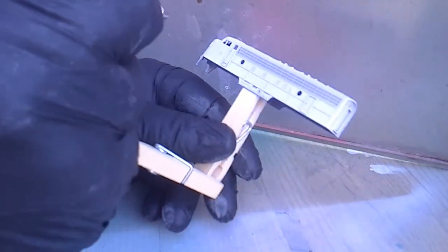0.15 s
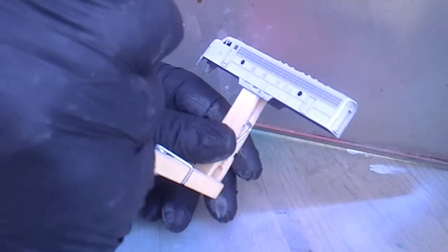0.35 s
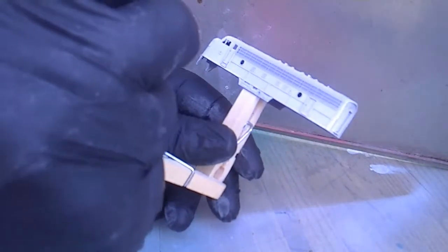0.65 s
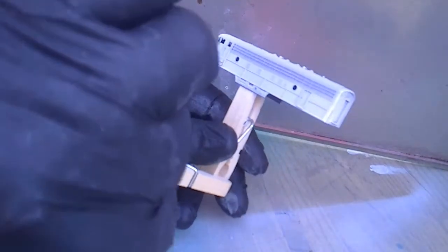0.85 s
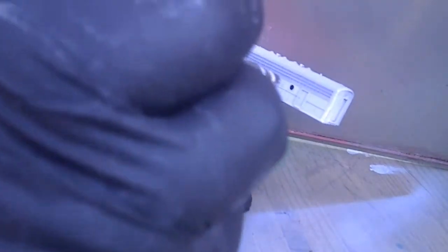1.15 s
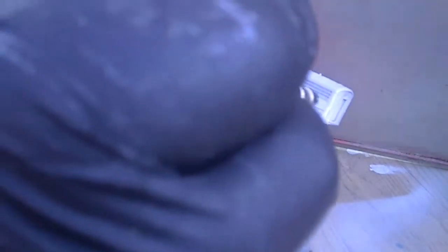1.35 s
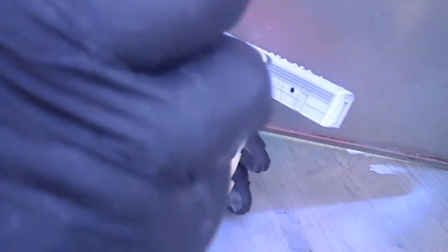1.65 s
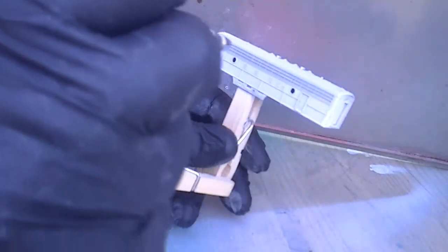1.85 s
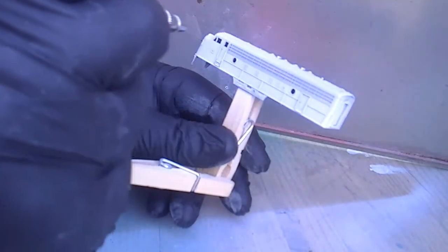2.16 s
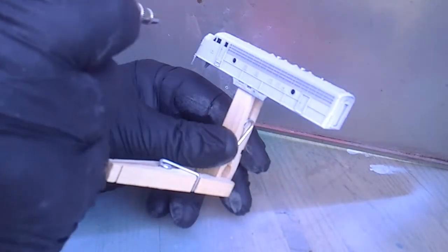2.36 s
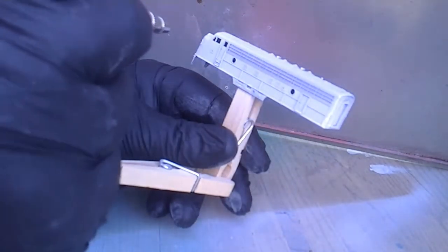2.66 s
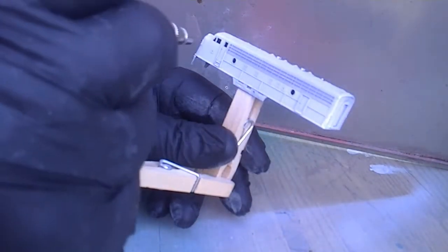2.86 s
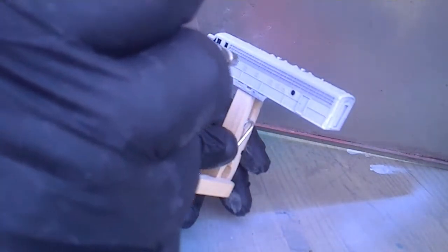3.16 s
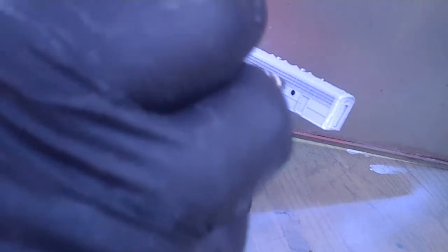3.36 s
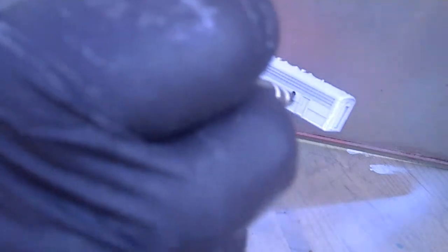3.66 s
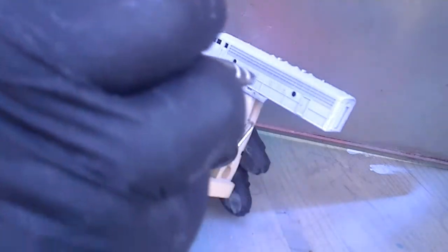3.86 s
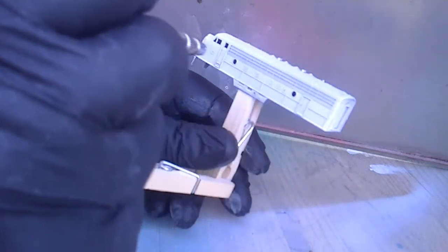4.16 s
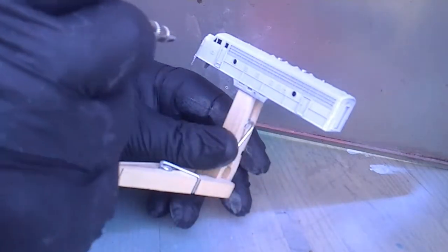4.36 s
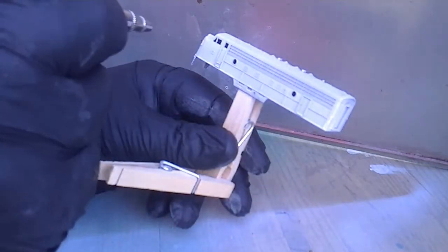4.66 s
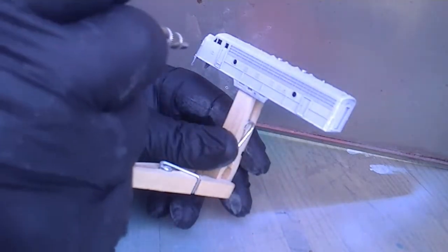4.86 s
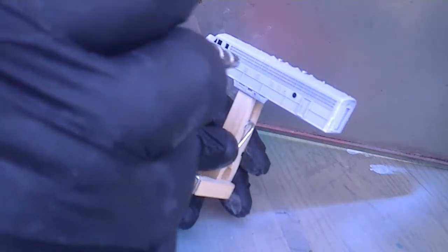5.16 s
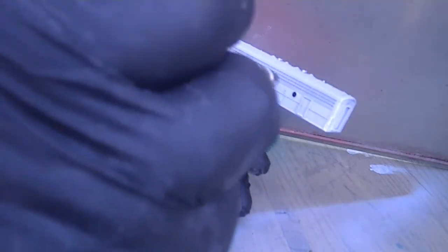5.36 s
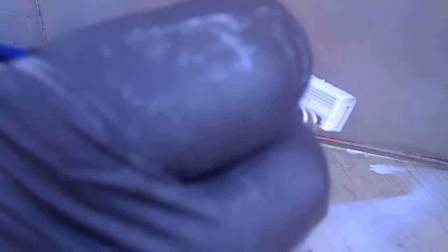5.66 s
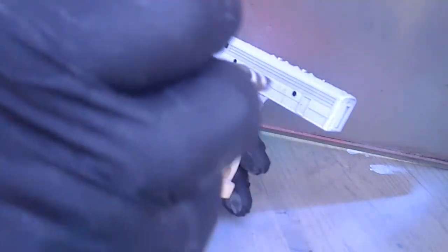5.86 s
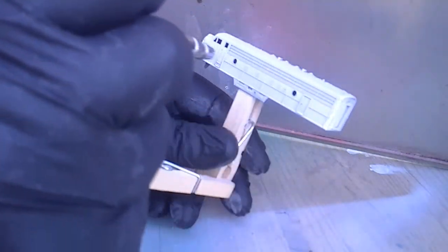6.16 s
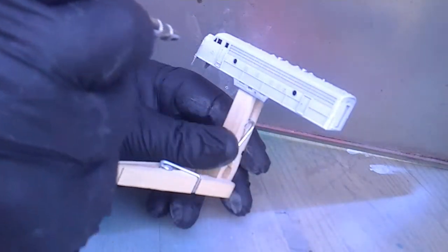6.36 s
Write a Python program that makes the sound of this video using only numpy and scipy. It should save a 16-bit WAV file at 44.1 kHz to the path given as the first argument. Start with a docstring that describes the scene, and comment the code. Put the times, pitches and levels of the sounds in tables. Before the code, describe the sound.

A fine jet of compressed air hisses continuously for about 6.5 seconds, close to a mono microphone in a dry, quiet room. At 0 s a short hollow plastic ring and the end of a pass give way to a roaring stroke along a small shell until about 1.4 s, after a rush and ring near 0.8 s and a singing edge burst at 1.2 s. More strokes follow, turning at about 1.4, 2.5, 3.6, 4.6 and 5.6 s, the hiss growing duller or brighter as the hand moves. Short breathy tonal bursts stand out around 2.0, 3.1, 3.4, 4.0, 5.1, 5.4 and 6.1 s. Strong bright rushes over the front end swell near 2.3, 2.9, 4.4, 5.0 and 6.5 s, the last cut off by the ending. Faint high whistles flicker throughout, over lumpy low air rumble.

```python
"""A steady airbrush hiss opens over a short ring of hollow plastic and the tail of a pass along its flat side.
The brush sweeps to and fro along the small model shell, close to a mono microphone: jet-driven resonances
roar on the flat side, sing in bursts at openings and edges, and rush over the shaped front end. The hiss is
filtered noise that changes colour as the hand moves, with a shifting echo; a lumpy low rumble lies below.
"""
import sys
import numpy as np
from scipy import signal
from scipy.fft import rfft, irfft, next_fast_len
from scipy.io import wavfile
from scipy.ndimage import map_coordinates

SR = 44100
rng = np.random.default_rng(int(sys.argv[2]) if len(sys.argv) > 2 else 0)


def transcribe(u):
    """Save the signal u as a 16-bit wav file named by the first command-line argument.

    u: samples, shape (n,) or (channels, n), limited to [-1, 1]; the rate is SR.
    q: integer samples, one column per channel.
    """
    v = np.clip(np.atleast_2d(u).T, -1, 1)
    q = np.round(v * 32767).astype(np.int16)
    wavfile.write(sys.argv[1], SR, q)


def volts_from_db(level):
    """Convert decibel levels to linear amplitude ratios."""
    exponent = np.asarray(level, float) / 20
    return 10 ** exponent


N = 287091  # length in samples

# Spectra and levels are relative where the sound is later scaled to rms 1.
# Resonance widths are those of one filter pass; each resonance is passed twice.

# nozzle hiss in the open at the left: hz, level_db
HISS_LEFT = [(100, -24.5), (500, -5.5), (1770, -10), (2400, -4), (3200, -10), (4600, -8), (5550, -4.5),
             (6150, -9.5), (6900, 0), (10200, -7), (11500, -1.5), (12800, -8.5), (15700, -4)]
# nozzle hiss from behind the hand at the right: hz, level_db
HISS_RIGHT = [(100, -24), (560, -4), (980, -11), (1350, -7), (1800, -12), (2200, -9), (2550, -20),
              (3150, -20), (3550, -5), (5900, -4), (8400, -7), (10300, -4), (13300, -5), (15700, -7)]
# the hand crosses the middle of its stroke, rightwards first, then turn about: middle_s, travel_s
MIDSTROKES = [(1.06, 0.47), (1.92, 0.51), (3.2, 0.56), (4.14, 0.76), (5.26, .5), (6.14, .45)]
# the hand's echo of the hiss: left_delay_ms, right_delay_ms, level_db, centre_hz, width_hz
HAND_ECHO = (.62, .775, -4, 11600, 4600)
# the hiss dips briefly: middle_s, length_s, share_lost_db
HISS_DIPS = [(.185, .04, -6)]
# narrow ripples in the hiss: hz, width_hz, level_db
HISS_RIPPLES = [(6830, 150, -3), (7300, 200, -4), (7780, 300, 0), (8200, 150, -2), (9100, 300, -2),
                (9700, 200, -4), (10870, 150, -4), (11450, 150, -4), (12500, 400, -6), (13300, 250, -8)]
# level of those ripples, strongest in the first second and near 6.25 s: time_s, level_db
RIPPLE_LEVEL = [(0, -29.5), (.9, -30.5), (1.15, -40), (2.4, -41), (4.3, -36), (5.9, -47), (6.25, -31),
                (6.51, -43)]
# faint 7 kHz whistle, its tone: hz, width_hz, level_db
WHISTLE_TONE = [(7000, 240, 0)]
# the whistle's swells, mostly near the left end: middle_s, length_s, level_db
WHISTLES = [(.75, 0.51, -36), (1.5, 0.21, -35), (2.38, 0.41, -38.5), (2.85, 0.36, -32.5), (4.53, .22, -29),
            (4.92, .22, -31), (6.48, .3, -39)]
NOZZLE_DB, SPLASH_DB = -24, -25  # steady hiss; hiss added per unit of rush over the front end
TREBLE_PATCHES_DB = -33  # bright treble patches that come and go at random in the hiss

# resonances of the shell and its holder: hz, width_hz
SHELL_MODES = [(560, 260), (740, 220), (980, 200), (1150, 240), (1460, 240), (1864, 150), (2030, 190),
               (2320, 150), (2430, 150), (2590, 220), (2880, 150), (3090, 180), (3230, 160), (3500, 250),
               (3736, 270), (4135, 180), (4350, 140), (4530, 180), (4975, 200), (5180, 250), (5410, 250),
               (5850, 350), (6400, 250), (7030, 280)]
# how strongly the jet excites each of them from the flat side: level_db
SIDE_DB = [-5.5, 0.5, 1, -2, 2, -7.5, -6.5, -17, -9.5, -7, -12, -13.5, -17, -11.5, -12, -13.5, -25, -19,
           -38, -56, -27, -13.5, -26, -23]
# the same for the singing edge tone: level_db
EDGE_TONE_DB = [-34, -31, -4.5, -4.5, -9, 2, 0, -2.5, -6, -22, -11, -9.5, -5, -3.5, 2, -9, -6, -6.5, -9,
                -26, -16.5, -9, -30, -11]
# the same from the front end: level_db
FRONT_DB = [-40, -30, -3.5, -8.5, -6.5, -6, -3, -11, -32, -6.5, -1, -5.5, -14, -9.5, -0.5, 0, -3.5, -4, -2,
            -15, -2.5, -13, -10.5, -13]
# air tearing at edges: hz, level_db
RUSH_TONE = [(500, -30), (1200, 5.5), (2000, 3.5), (4000, -13), (5800, 3), (6300, -6.5), (8000, -3.5),
             (12000, -21)]
# passes along the flat side: leave_s, length_s, level_db, rise_from_middle_to_end_db, fade_in_s
PASSES = [(.07, .8, -16.5, 0, .1), (1.41, 0.91, -21, 0, 0.23), (2.53, .89, -22, 0, 0.091),
          (3.6, 0.9, -21, 1, .12), (4.645, 0.975, -25, 2, 0.11), (5.62, 0.85, -22.5, 4, 0.053),
          (6.75, 0.86, -26, -4.5, 0.1)]
LEAVE_S, ARCH_DB, SPILL_DB = 0.12, 4, -41.5  # fade on leaving, loss towards the ends, level off the shell
# bursts of singing edge tone, at openings and at the shell's edges: middle_s, length_s, level_db
EDGE_TONES = [(0.763, 0.2, -26.5), (1.21, 0.08, -19), (1.986, 0.097, -30), (2.76, 0.15, -32),
              (3.07, .16, -24.5), (3.397, 0.12, -21.5), (3.795, .06, -31), (4.002, 0.14, -15.5),
              (4.352, .12, -27.5), (5.071, 0.14, -19.5), (5.401, 0.15, -22.5), (5.922, 0.1, -36),
              (6.074, 0.14, -18), (6.416, 0.13, -25.5)]
# the jet's fringe around each edge tone: weaker, so many times longer, trailing
FRINGE_DB, FRINGE_WIDTH, FRINGE_LATE_S = -15.5, 3.1, 0.034
# the jet rushes over the front end: middle_s, length_s, level_db
FRONTS = [(.78, 0.37, -25.5), (2.32, .14, -19.5), (2.94, 0.27, -18), (4.0, 0.097, -23), (4.39, 0.28, -17.5),
          (4.61, 0.065, -25.5), (4.98, 0.27, -17.5), (6.06, 0.06, -21), (6.46, 0.27, -15.5)]
# the hollow shell's ring, its tone: hz, width_hz, level_db
RING_TONE = [(1490, 150, 0)]
# the hollow shell rings: middle_s, length_s, level_db
RINGS = [(0, 0.13, -20.5), (.76, 0.44, -26.5), (1.15, .4, -41), (2.33, .15, -23), (2.98, 0.28, -23),
         (4.25, 0.25, -37), (5.32, 0.3, -29), (6.22, 0.21, -24.5)]
# deeper roar on the shell, its tone: hz, width_hz, level_db
ROAR_TONE = [(680, 350, 0)]
# the deeper roar swells: middle_s, length_s, level_db
ROARS = [(1.85, 0.45, -28), (2.74, 0.19, -31), (3.72, 0.16, -43), (4.62, 0.17, -31), (4.86, 0.17, -27.5),
         (5.3, .3, -32.5)]
# tone of the short edge bursts near 2.7 kHz: hz, width_hz, level_db
EDGE_BURST_TONE = [(2730, 790, 0)]
# short edge bursts near 2.7 kHz: middle_s, length_s, level_db
EDGE_BURSTS = [(1.22, 0.087, -35), (2.75, 0.11, -32), (4.6, 0.061, -25.5), (4.83, .07, -25)]

# air spilling back towards the microphone: time_s, level_db
BUFFET_LEVEL = [(0, -33.5), (.4, -36), (.9, -30.5), (1.3, -37.5), (1.7, -30.5), (2.5, -30.5), (3.2, -46),
                (3.75, -29), (3.95, -48), (4.5, -45), (4.6, -28), (4.72, -33), (4.85, -26.5), (4.95, -58),
                (5.5, -34), (5.75, -29.5), (6.1, -40.5), (6.51, -43)]
# colour of that air: hz, level_db
BUFFET_TONE = [(30, -50), (60, -36), (100, -16), (150, -7), (230, 0), (330, -2), (450, 2.5), (700, -7.5)]
# microphone response: hz, level_db
MICROPHONE = [(12500, -0.5), (13300, -6), (13800, -1.5), (14400, -7), (15100, -7.5), (15700, -8)]


def nozzle():
    """Turbulent hiss with the hand's echo, narrow ripples, a faint whistle and bright treble patches."""
    place = hand_place()
    steady = volts_from_db(NOZZLE_DB) * np.clip(1 - bursts(HISS_DIPS, flat=2.2), 0, 1)
    splash = volts_from_db(SPLASH_DB) * bursts(FRONTS, flat=1.2)
    air = flutter(0.4, 200) * flutter(0.3, 8) * rng.standard_normal(N)
    # the hiss changes colour as the hand covers it
    direct = (1 - place) * coloured(HISS_LEFT, air) + place * coloured(HISS_RIGHT, air)
    hiss = (steady + splash) * rms_one(direct + hand_echo(direct, place))
    ripples = level_in_time(RIPPLE_LEVEL) * blown(HISS_RIPPLES, rough_db=0.4, wander_db=2.0)
    whistle_level = volts_from_db(-48) + bursts(WHISTLES, flat=1.8)
    whistle = whistle_level * blown(WHISTLE_TONE, rough_db=1.2, wander_db=1.5)
    patch_modes = [(hz, 450, 0) for hz in np.arange(7400, 13600, 520)]
    patches = volts_from_db(TREBLE_PATCHES_DB) * blown(patch_modes, rough_db=0.4, wander_db=5.0)
    return hiss + ripples + whistle + patches


def hand_place():
    """Position of the hand along its stroke: 0 at the left, 1 at the right."""
    strokes = [(-1) ** k * step(s, travel) for k, (s, travel) in enumerate(MIDSTROKES)]
    return np.clip(sum(strokes), 0, 1)


def hand_echo(direct, place):
    """A treble reflection whose delay shifts with the stroke, sweeping ripples through the hiss."""
    left_ms, right_ms, echo_db, hz, width = HAND_ECHO
    lag = (left_ms + (right_ms - left_ms) * place) * SR / 1000  # samples
    echo = signal.sosfiltfilt([resonance(hz, width)], direct)
    echo = map_coordinates(echo, [np.arange(N) - lag], order=3, mode="mirror")
    # the hand faces the nozzle best past mid-stroke
    facing = volts_from_db(echo_db - 14 * np.abs(place - 0.6)) * flutter(2.0, 5)
    return facing * echo


def jet_on_shell():
    """The jet excites the shell's flat side, edges and front end, and the air inside it."""
    side = along_side() * shell_part(SIDE_DB, rush_db=-13.5, rough_db=0.5)
    edge_tone = edge_tone_level() * shell_part(EDGE_TONE_DB, rush_db=-8, rough_db=1.5)
    front = bursts(FRONTS, flat=3.0) * shell_part(FRONT_DB, rush_db=-6, rough_db=1.4)
    hollow = bursts(RINGS, flat=2.4) * blown(RING_TONE, rough_db=2.0, wander_db=5.5)
    roar = bursts(ROARS, flat=2.6) * blown(ROAR_TONE, rough_db=0.8, wander_db=1.3)
    edge_burst = bursts(EDGE_BURSTS, flat=2.5) * blown(EDGE_BURST_TONE, rough_db=1.0, wander_db=0.2)
    return side + edge_tone + front + hollow + roar + edge_burst


def along_side():
    """Level on the flat side: each pass fades in, arches over the middle and fades out."""
    level = volts_from_db(SPILL_DB)
    for leave, length, db, rise_db, fade in PASSES:
        # -1 on arriving, 1 on leaving
        way = np.clip(2 * (np.arange(N) / SR - leave) / length + 1, -1, 1)
        arch = volts_from_db(db + rise_db * way - ARCH_DB * way ** 2)
        level = level + arch * step(leave - length, fade) * (1 - step(leave, LEAVE_S))
    return level


def edge_tone_level():
    """Level of the singing edge tone: the jet's core, then its weaker, longer, trailing fringe."""
    fringe = [(s + FRINGE_LATE_S, FRINGE_WIDTH * length, db + FRINGE_DB) for s, length, db in EDGE_TONES]
    return bursts(EDGE_TONES, flat=3.2) + bursts(fringe, flat=4.5)


def shell_part(modes_db, rush_db, rough_db):
    """The shell's resonances over a broad rush of air; rms 1."""
    modes = [(hz, width, db) for (hz, width), db in zip(SHELL_MODES, modes_db)]
    rush = coloured(RUSH_TONE, flutter(rough_db, 120) * rng.standard_normal(N))
    return rms_one(blown(modes, rough_db, wander_db=0.9) + volts_from_db(rush_db) * rush)


def buffet():
    """A low, lumpy rumble of displaced air."""
    rumble = coloured(BUFFET_TONE, rng.standard_normal(N))
    return level_in_time(BUFFET_LEVEL) * flutter(2.1, 9.3) * rumble


def blown(modes, rough_db, wander_db):
    """Turbulent air drives resonances; gusts are shared, each mode also wanders alone; rms 1."""
    gusts = flutter(rough_db, 150) * flutter(0.8 * rough_db, 9)
    air = gusts * rng.standard_normal((2, N))  # modes take turns on two streams
    out = 0
    for k, (hz, width, level_db) in enumerate(modes):
        section = resonance(hz, width)
        ringing = signal.sosfilt([section, section], air[k % 2])
        sign = (-1) ** (k // 2)
        out = out + sign * volts_from_db(level_db) * flutter(wander_db, 2.5) * ringing
    return rms_one(out)


def resonance(hz, width):
    """One band-pass section with gain 1 on top."""
    r = np.exp(-np.pi * width / SR)
    return [(1 - r * r) / 2, 0, (r * r - 1) / 2, 1, -2 * r * np.cos(2 * np.pi * hz / SR), r * r]


def flutter(spread_db, rate):
    """A gain that wanders: noise twice through a one-pole low-pass at rate Hz, read as dB."""
    r = np.exp(-64 * np.pi * rate / SR)  # drawn every 32 samples
    noise = rng.standard_normal(N // 32 + 2002)
    slow = signal.lfilter([1], [1, -2 * r, r * r], noise)[2000:]  # drop the run-in
    gain = volts_from_db(spread_db * rms_one(slow))
    return np.interp(np.arange(N) / 32, np.arange(len(slow)), gain)


def coloured(spectrum, white):
    """Noise given a spectrum; rms 1."""
    return rms_one(shaped(spectrum, white))


def shaped(spectrum, x):
    """Filter by a spectrum drawn on a log-frequency axis."""
    size = next_fast_len(N)
    hz = np.maximum(np.arange(size // 2 + 1) * SR / size, 1)
    point_hz, point_db = np.transpose(spectrum)
    gain = volts_from_db(np.interp(np.log(hz), np.log(point_hz), point_db))
    return irfft(rfft(x, size) * gain, size)[..., :N]


def bursts(rows, flat):
    """Bells of pressure, half height over their length; flat squares off their tops."""
    t = np.arange(N) / SR
    return sum(volts_from_db(db) * 0.5 ** (np.abs(2 * (t - s) / length) ** flat) for s, length, db in rows)


def step(s, length):
    """A smooth rise from 0 to 1 around time s."""
    return 0.5 + 0.5 * np.tanh(2 * (np.arange(N) / SR - s) / length)


def level_in_time(rows):
    """Gain from a table of times and dB levels joined by straight lines."""
    s, db = np.transpose(rows)
    return volts_from_db(np.interp(np.arange(N) / SR, s, db))


def rms_one(x):
    """Scale to unit rms."""
    return x / np.sqrt(np.mean(x ** 2) + 1e-20)


def scene():
    """All sources reach one microphone, heard alike in both channels."""
    return np.tile(nozzle() + jet_on_shell() + buffet(), (2, 1))


def roll_off(x):
    """The treble ends steeply here."""
    return signal.sosfilt(signal.butter(12, 15800, fs=SR, output="sos"), x)


def record(dry):
    """The microphone cuts the bass and sags in the top octave."""
    heard = shaped(MICROPHONE, dry)
    bass_cut = signal.butter(4, 95, "high", fs=SR, output="sos")
    return roll_off(signal.sosfilt(bass_cut, heard))


dry = scene()
out = record(dry)
transcribe(out)
```